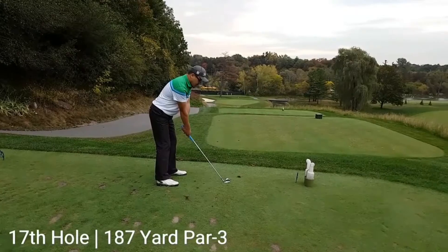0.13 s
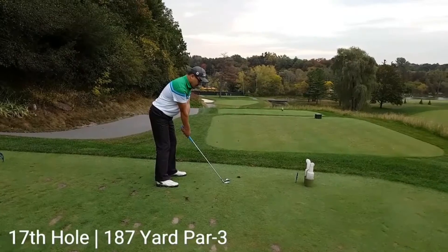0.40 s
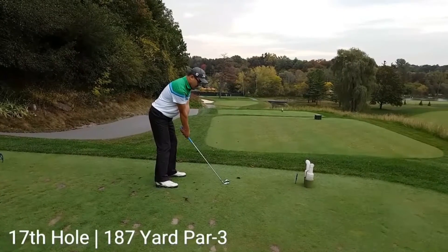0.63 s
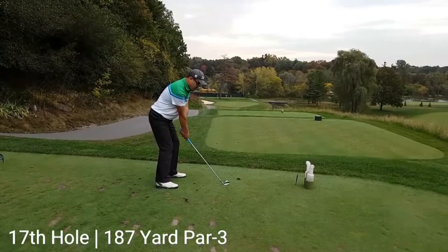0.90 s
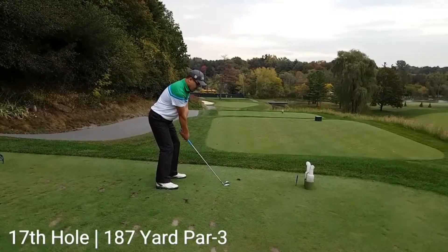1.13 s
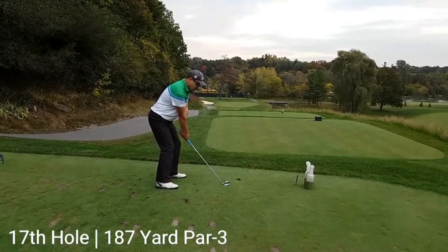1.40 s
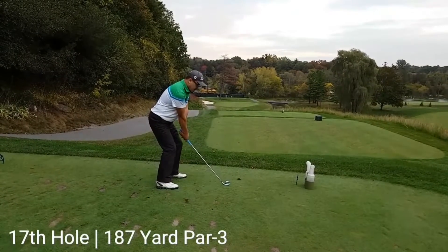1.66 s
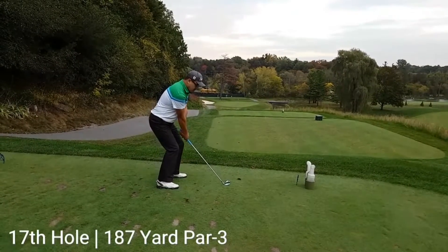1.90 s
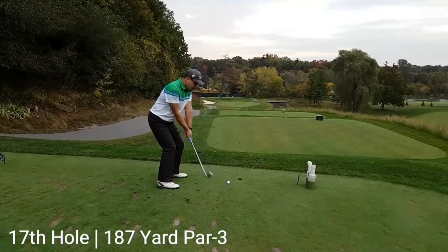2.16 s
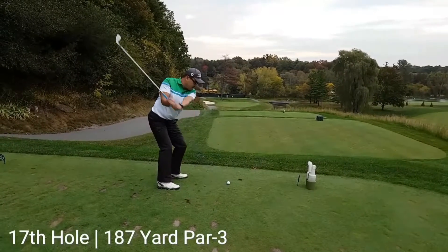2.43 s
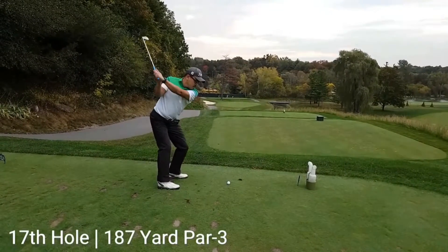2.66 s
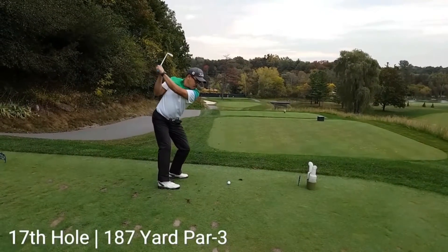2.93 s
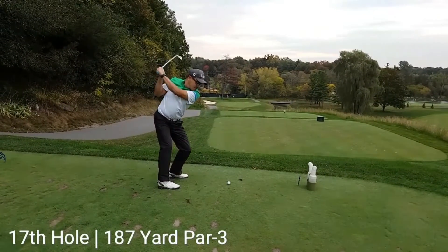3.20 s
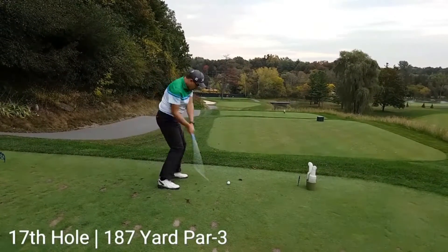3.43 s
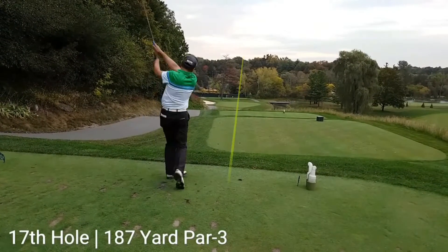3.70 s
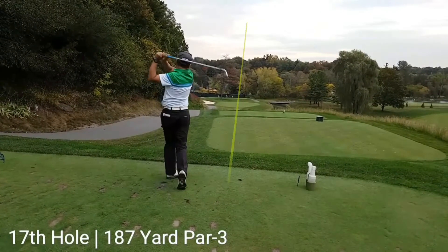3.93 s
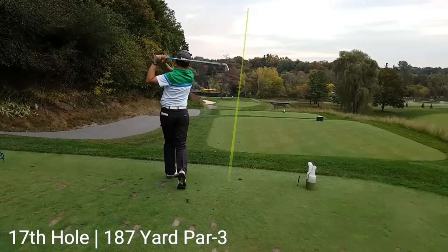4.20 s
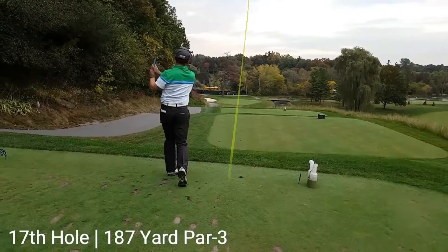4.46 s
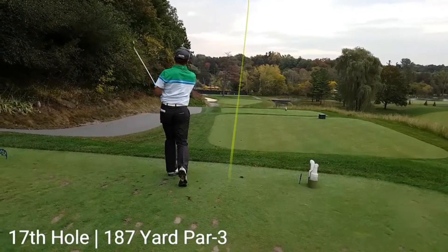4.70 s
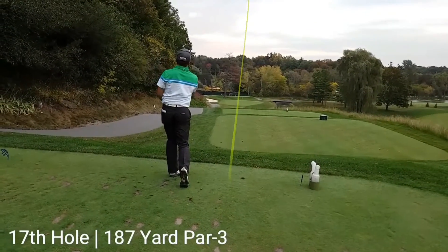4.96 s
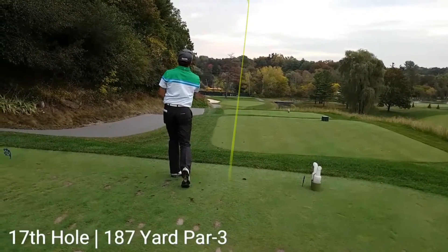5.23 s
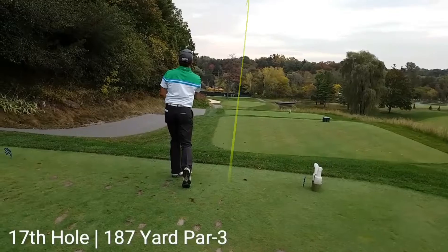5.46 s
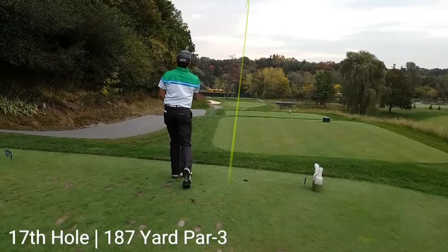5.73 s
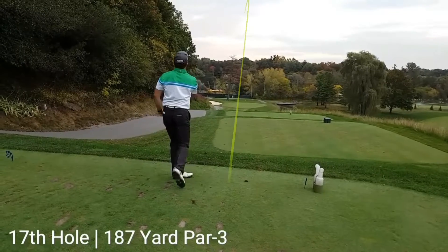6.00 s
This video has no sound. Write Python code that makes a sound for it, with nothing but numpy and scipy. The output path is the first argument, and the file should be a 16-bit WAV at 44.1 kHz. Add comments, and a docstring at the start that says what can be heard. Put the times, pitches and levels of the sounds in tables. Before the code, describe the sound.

An open golf tee beside trees, heard in wide stereo from a few metres away. From 0 s there is a quiet bed: distant traffic hum slightly to the right, thin leaf rustle, and low wind rumbling unevenly on each microphone, often more on the left. Soft wind thumps come near 0.0, 0.3, 1.6 and 2.1 s. Around 2.7 to 3.2 s a far bird gives three faint, short nasal calls. At about 3.6 s a rushing whoosh rises quickly in pitch and strength, and at 3.7 s the iron meets ball and turf: one very sharp, bright, dry click with a tiny gritty tail. About 30 ms later the wooded bank returns a dense hiss, dulling and fading within half a second. Strong low wind bumps follow near 3.95, 4.8, 4.9 and 5.7 s; a faint bird call comes at 4.4 s. Quiet air and rumble continue to 6.1 s.

```python
"""On a golf tee beside a wooded bank, an iron swings down and strikes the ball.
The shaft sheds vortices and the head hisses; pulses, decaying modes and noise make the click on ball and turf;
the bank scatters the click back as a dense hiss. Wind eddies rumble separately on two spaced microphones,
traffic noise hums from the right among stirring leaves, and a far bird calls in arched harmonic tones."""
import sys
import numpy as np
from scipy import signal
from scipy.fft import rfft, irfft, next_fast_len
from scipy.io import wavfile
from scipy.ndimage import map_coordinates

SR = 44100
rng = np.random.default_rng(int(sys.argv[2]) if len(sys.argv) > 2 else 0)


def wav_out(sig):
    """Save sig, one row per channel (or a flat mono array), as 16-bit PCM at SR to the path in sys.argv[1]."""
    wavfile.write(sys.argv[1], SR, np.round(np.clip(np.atleast_2d(sig).T, -1, 1) * 32767).astype(np.int16))


def field_ratio(decibels):
    """Amplitude ratio for a level in dB (20 dB per decade); scalars and array-likes work."""
    return 10 ** (np.asarray(decibels, dtype=float) / 20)


N = 269451

# Spectrum of wind pressure on a microphone. Each row: frequency in Hz, relative level in dB per Hz.
BUFFET_SPECTRUM = [(15, -44), (28, -10), (65, 1.5), (118, 0), (189, -6.5), (271, -8), (400, -15),
                   (545, -26), (910, -53.5), (1540, -120)]
# Wind between gusts. Each row: time in seconds, level in dB, left-right difference in dB.
CALM_WIND = [(0, -56, 10), (1, -58, 7), (2, -54.5, 6), (2.8, -55.5, -5), (3.2, -60.5, 0.5),
             (3.6, -53.5, 7.5), (4.4, -52.5, 6), (5.1, -53.5, 1), (6.11, -53.5, 4)]
# Gusts. Each row: start in seconds, length in seconds, level in dB, left-right difference in dB.
GUST_EVENTS = [(0.043, .12, -54.5, 12), (1.058, .14, -50, 1.5), (1.466, 0.031, -51, 13),
               (1.58, 0.033, -48, 10), (1.954, 0.043, -52.5, 6), (2.103, 0.083, -49.5, 4),
               (2.418, 0.092, -52.5, -5), (2.6, 0.064, -52, -6), (2.846, 0.064, -50, 2),
               (3.384, 0.16, -52.5, 10), (3.862, .1, -49, 11.5), (3.982, .23, -41, 3.5),
               (4.58, 0.083, -49.5, 1), (4.752, 0.046, -44, 4), (4.88, .11, -41.5, -1.5),
               (5.238, .04, -47.5, 11), (5.55, 0.038, -50, 8), (5.679, .09, -49.5, 2), (5.9, .04, -52, 5),
               (6.042, 0.073, -46, 11)]
# Single strong eddies. Each row: start in seconds, level in dB, left-right difference in dB.
EDDY_THUMPS = [(0.044, -46, 14.0), (0.293, -44.5, 13.0), (1.576, -40, 10.5), (2.116, -37.5, 5),
               (3.376, -57, 5), (3.618, -41, -2), (3.93, -40, 12), (3.975, -35, -7), (4.576, -46, 2),
               (4.76, -34, 3.5), (4.884, -33, 2), (5.247, -39, 1), (5.626, -43, 1), (5.737, -34.5, 3.5)]
# Spectrum of traffic and leaves. Each row: frequency in Hz, relative level in dB per Hz.
FAR_SPECTRUM = [(88, -32), (150, -3), (294, -10.5), (357, -6.5), (505, -13), (624, -6), (772, -4.5),
                (1010, -13), (1300, -11.5), (1490, -18), (2810, -28), (8100, -35.5), (9450, -38),
                (13900, -32.5), (15000, -43)]
# Share of the far sound's power that comes from the road. Each row: frequency in Hz, share from 0 to 1.
ROAD_SHARE = [(200, 0.65), (600, 0.65), (1400, 0.42), (3000, .3), (6000, 0.031)]
# Leaves stirring. Each row: time in seconds, level in dB, of which only the departure from the mean counts.
LEAF_STIR = [(0, -83), (1, -81.5), (2.3, -81), (2.6, -78), (3.3, -82), (4.1, -78), (4.5, -81),
             (6.11, -80.5)]
# Bird calls. Each row: start in seconds, length in seconds, top pitch in Hz, level in dB.
BIRD_CALLS = [(2.69, .15, 910, -73.5), (2.83, .035, 820, -71), (3.025, .16, 920, -77.5),
              (4.41, .12, 892, -78)]
# Harmonics of the call before the throat. Each row: multiple of the pitch, level in dB.
CALL_HARMONICS = [(3, 3), (4, -2)]
# Rush of air past the club. Each row: time in seconds, level in dB relative to full speed.
SWING_RUSH = [(3.48, -42), (3.61, -30), (3.655, -13), (3.679, -1), (3.699, -1), (3.706, -19), (3.76, -26.5),
              (3.85, -41.5)]
# Hiss of the club head. Each row: frequency in Hz, relative level in dB per Hz.
HEAD_HISS_SPECTRUM = [(590, -30.5), (1000, -5), (1910, -12.5), (2160, -9.5), (4030, -18.5), (12900, -24),
                      (15000, -30)]
# Contacts with ball and turf. Each row: time in seconds, level in dB, left-right difference in dB.
IMPACTS = [(3.70024, -20, -1), (3.70038, -5, 0), (3.7008, -15, -2), (3.7017, -19, 3), (3.7029, -27, -4)]
# Modes of turf, ball and club head. Each row: frequency in Hz, relative level in dB, 60 dB decay time in seconds.
IMPACT_MODES = [(330, -24.5, 0.02), (1030, -19.5, .014), (1670, -17, 0.012), (2050, -13, .011),
                (2570, -14, .009), (3160, -12.5, 0.009), (3660, -15, .008), (4180, -13, .008),
                (4780, -14.5, .008), (5550, -7, .008), (9300, -20.5, 0.0066), (11600, -12, 0.0055),
                (13090, -14, .006)]
# Spectrum of the click. Each row: frequency in Hz, relative level in dB per Hz.
CLICK_SPECTRUM = [(120, -39), (200, -15), (3440, -3), (5290, 0.5), (6320, -6.5), (7700, -6.5), (9370, 0.5),
                  (12000, -1.5), (14400, -15.5)]
# Spectrum of the scattered return. Each row: frequency in Hz, relative level in dB per Hz.
RETURN_SPECTRUM = [(500, -30.5), (900, -6.5), (1600, -8), (2600, -5.5), (3400, -11), (4300, -4), (5700, -2),
                   (6600, 0), (7600, -3.5), (9000, -5), (14500, -7.5)]


def unit(x):
    """Normalization: a signal divided by its root mean square has rms 1."""
    return x / np.sqrt(np.mean(x ** 2, axis=-1, keepdims=True) + 1e-20)


def along(points, hz):
    """Logarithmic frequency scale: (Hz, value) points are interpolated on it."""
    point_hz, value = np.transpose(points)
    return np.interp(np.log(hz + 1), np.log(point_hz + 1), value)


def curves(rows):
    """Linear interpolation in time: one curve for each column after the seconds."""
    seconds, *columns = np.transpose(rows)
    return [np.interp(np.arange(N) / SR, seconds, column) for column in columns]


def sides(pan_db):
    """Interchannel level difference: half is added on the left and half removed on the right."""
    return field_ratio(np.array([pan_db / 2, -pan_db / 2]))


def wobble(rate):
    """Slow random modulation: splines through random knots, rate knots a second, one per microphone."""
    knots = rng.standard_normal((2, int(N * rate / SR) + 4))
    return np.array([map_coordinates(k, [np.arange(N) * rate / SR]) for k in knots])


def filtered(x, response):
    """Linear filtering: the spectrum is multiplied by a response of frequency."""
    size = next_fast_len(N + 8192)
    return irfft(rfft(x, size) * response(np.fft.rfftfreq(size, 1 / SR)), size)[..., :N]


def noise(spectrum, channels=2):
    """Coloured noise: independent white noises are filtered to a spectrum, each with rms 1."""
    white = rng.standard_normal((channels, N))
    return unit(filtered(white, lambda hz: field_ratio(along(spectrum, hz))))


def burst(start, length, edge):
    """Trapezoidal envelope: linear rise, hold and linear fall, half height at start and end."""
    t = np.arange(N) / SR - start
    return np.clip(np.minimum(t / edge + .5, (length - t) / edge + .5), 0, 1)


def wind():
    """Turbulent pressure: eddies rumble independently on each microphone, the strongest as short thumps."""
    calm_db, pan_db = curves(CALM_WIND)
    power = (field_ratio(calm_db + 2.5 * wobble(7)) * sides(pan_db)) ** 2
    for start, length, db, pan in GUST_EVENTS:
        power += (field_ratio(db) * sides(pan)[:, None] * burst(start, length, 0.021)) ** 2
    lumps = field_ratio(.8 * wobble(17) + 3.8 * wobble(45))
    out = np.sqrt(power) * unit(lumps * noise(BUFFET_SPECTRUM))

    t = np.arange(4096) / SR
    for start, db, pan in EDDY_THUMPS:
        hz = 110 * np.exp(0.16 * rng.standard_normal((2, 1)))
        envelope = field_ratio(-60 * t / 0.067) * (1 - np.exp(-t / 0.0018))
        push = np.sin(2 * np.pi * hz * t) * envelope
        part = out[:, round(start * SR):][:, :len(t)]
        part += (field_ratio(db) * sides(pan)[:, None] * push)[:, :part.shape[1]]
    return out


def distance():
    """Arrival-time difference: traffic reaches the right microphone first; diffuse leaf treble follows the breeze."""
    level_db, road_lag = -55, 18  # lag of the left microphone in samples
    left, right, road = noise(FAR_SPECTRUM, channels=3)

    def share(hz):
        """Power division: the fraction arriving from the road depends on frequency."""
        return np.clip(along(ROAD_SHARE, hz), 0, 1)

    diffuse = filtered(np.array([left, right]), lambda hz: np.sqrt(1 - share(hz)))
    road = filtered(road, lambda hz: np.sqrt(share(hz)))
    air = diffuse + np.array([np.roll(road, road_lag), road])
    leaves = filtered(air, lambda hz: hz ** 2 / (hz ** 2 + 2200 ** 2))
    hum = (air - leaves) * field_ratio(.8 * wobble(2.3))
    breeze_db, = curves(LEAF_STIR)
    stir = field_ratio(breeze_db - breeze_db.mean() + .6 * wobble(9.4))
    return field_ratio(level_db) * sides(-.6)[:, None] * (hum + leaves * stir)


def bird():
    """Source and filter: harmonics of an arched, slightly unsteady pitch pass a throat resonance and sound nasal."""
    throat_hz, throat_width_hz = 3150, 750
    sag, edge_s = .035, .025  # share of pitch lost at both ends; rise and fall time
    out, t = np.zeros(N), np.arange(N) / SR
    for start, length, top_hz, db in BIRD_CALLS:
        pitch_shake, level_shake = wobble(60)
        position = np.clip(2 * (t - start) / length - 1, -1, 1)
        hz = top_hz * (1 - sag * position ** 4 + 0.006 * pitch_shake)
        phase = 2 * np.pi * np.cumsum(hz) / SR
        tone = np.zeros(N)
        for multiple, level in CALL_HARMONICS:
            throat = 1 / (1 + ((multiple * hz - throat_hz) / throat_width_hz) ** 2)
            tone += field_ratio(level) * throat * np.sin(multiple * phase)
        out += burst(start, length, edge_s) * field_ratio(db + 2.5 * level_shake) * tone
    return out * sides(-1.7)[:, None]


def swing():
    """Vortex shedding: the shaft's whistle rises in pitch and level with speed, as the head's hiss grows."""
    whistle_db, hiss_db, hiss_slope = -35, -43, 0.7  # at full speed; slopes in dB per dB of rush
    shedding_hz, pitch_slope = 670, .06  # reference rate at full speed, multiplied below
    bright_hz, bright_slope = 4500, .6  # hiss above this grows faster, by this extra slope
    rush_db, = curves(SWING_RUSH)
    hz = shedding_hz * field_ratio(pitch_slope * rush_db)
    phase = 2 * np.pi * np.cumsum(hz) / SR
    slow = filtered(rng.standard_normal((2, N)), lambda f: 1 / (1 + (f / 110) ** 2))

    def shed(multiple):
        """Quadrature modulation: slow noises turn a tone into a narrow noise band."""
        return unit(slow[0] * np.cos(multiple * phase) + slow[1] * np.sin(multiple * phase))

    whistle = field_ratio(whistle_db + rush_db) * (shed(0.97) + field_ratio(-12.5) * shed(1.8))
    shared, own = noise(HEAD_HISS_SPECTRUM, channels=1), noise(HEAD_HISS_SPECTRUM)
    hiss = 0.8 * shared + .5 * own
    top = filtered(hiss, lambda f: f ** 2 / (f ** 2 + bright_hz ** 2))
    brightened = hiss - top + field_ratio(bright_slope * rush_db) * top
    head = field_ratio(hiss_db + hiss_slope * rush_db) * brightened
    live = burst(SWING_RUSH[0][0], SWING_RUSH[-1][0] - SWING_RUSH[0][0], .04)
    return live * (whistle * sides(-1.2)[:, None] + head)


def click_pulse(length):
    """Minimum phase: folding the cepstrum gives a causal pulse of the click's colour, its largest peak scaled to 1."""
    size = 2 * length
    log_gain = along(CLICK_SPECTRUM, np.fft.rfftfreq(size, 1 / SR)) * np.log(10) / 20
    cepstrum = irfft(log_gain, size)
    cepstrum[1:size // 2] *= 2
    cepstrum[size // 2 + 1:] = 0
    pulse = irfft(np.exp(rfft(cepstrum)), size)[:length]
    return pulse / -np.abs(pulse).max()  # the minus sign turns the pulse inward


def strike():
    """Impact excitation: each contact gives a sharp pulse, decaying modes and crackle; grit sprays off the turf."""
    pulse_db, ring_db = -9, -3
    crackle_db, crackle_slope = -25.5, .35  # crackle grows only weakly with the blow, in dB per dB
    spray_s, spray_length_s, spray_db, spray_fade_db_per_s = 3.703, .0095, -31, 1100
    out, t = np.zeros((2, N)), np.arange(2048) / SR
    pulse = click_pulse(len(t))
    for start, db, pan_db in IMPACTS:
        ring = np.zeros((2, len(t)))
        for hz, level, t60 in IMPACT_MODES:
            decay = field_ratio(level + rng.normal(0, 1.7, (2, 1)) - 60 * t / t60)
            ring += decay * np.cos(2 * np.pi * hz * t + rng.normal(0, .5, (2, 1)))
        shared, *own = rng.standard_normal((3, len(t))) * field_ratio(-60 * t / 0.0057)
        grains = shared + 0.67 * np.array(own)
        crackle = signal.fftconvolve(grains, pulse[None], axes=1)[:, :len(t)]
        sound = field_ratio(db) * (field_ratio(pulse_db) * pulse - field_ratio(ring_db) * ring)
        sound = sound + field_ratio(crackle_db + crackle_slope * db) * crackle
        out[:, round(start * SR):][:, :len(t)] += sides(pan_db)[:, None] * sound

    fade_db = -spray_fade_db_per_s * np.clip(np.arange(N) / SR - spray_s, 0, None)
    spray_level = field_ratio(spray_db + fade_db + 2.5 * wobble(900))
    return out + burst(spray_s, spray_length_s, .002) * spray_level * noise(CLICK_SPECTRUM)


def bank():
    """Diffuse scattering: leaves and trunks return a dense hiss about 30 ms late; later paths lose their treble."""
    start_s, rise_s, hold_s = 3.733, 0.0043, 0.061  # first echo, its rise, how long near trees keep it up
    level_db, fade_db_per_s = -44.5, 90
    dull_hz, dull_s = 7600, .2  # corner of the late paths, time until all of the hiss is dull
    t = np.arange(N) / SR - start_s
    fade_db = fade_db_per_s * np.clip(t - hold_s, 0, None)
    level = field_ratio(level_db - fade_db + 1.8 * wobble(110))
    hiss = noise(RETURN_SPECTRUM)
    dull = filtered(hiss, lambda hz: 1 / (1 + (hz / dull_hz) ** 4))
    late = np.clip((t - hold_s) / dull_s, 0, 1)
    echo = late * dull + (1 - late) * hiss
    return burst(start_s, 1, rise_s) * level * sides(1)[:, None] * echo


def scene():
    """Superposition: the pressures of all sources add at the two microphones."""
    return wind() + distance() + bird() + swing() + strike() + bank()


def roll_off(x):
    """The treble ends steeply here."""
    return signal.sosfilt(signal.butter(12, 15800, fs=SR, output="sos"), x)


def record(dry):
    """Band limitation: the treble from 14560 Hz upward is reduced by 33.5 dB."""
    limited = filtered(dry, lambda hz: np.where(hz < 14560, 1, field_ratio(-33.5)))
    return roll_off(limited)


dry = scene()
out = record(dry)
wav_out(out)
```